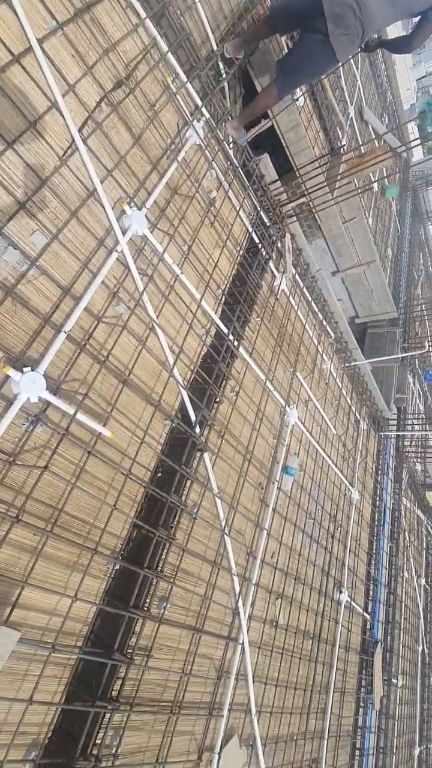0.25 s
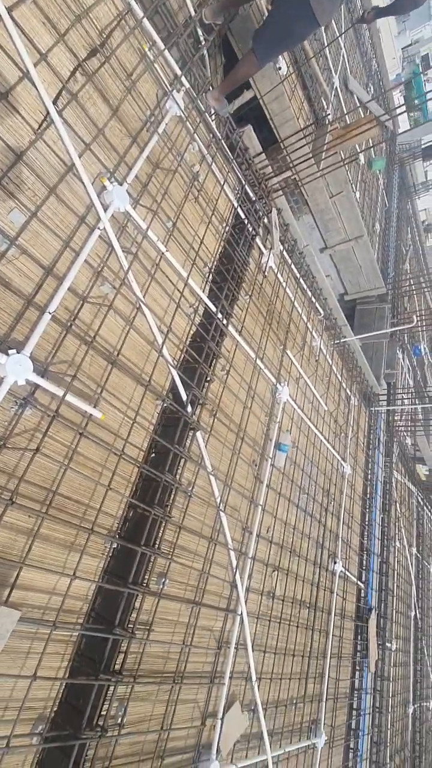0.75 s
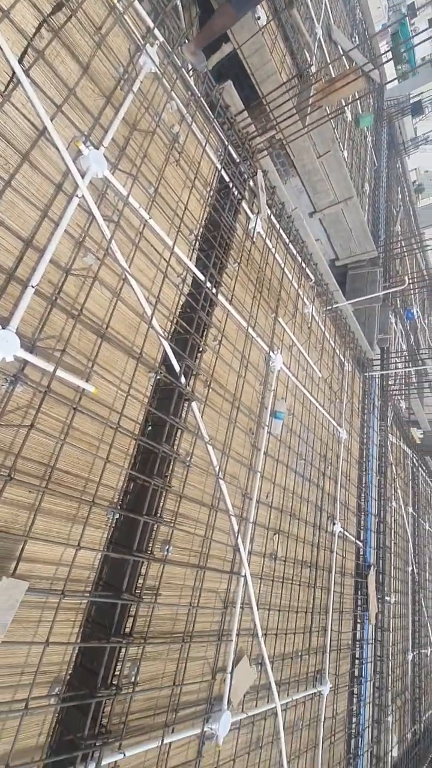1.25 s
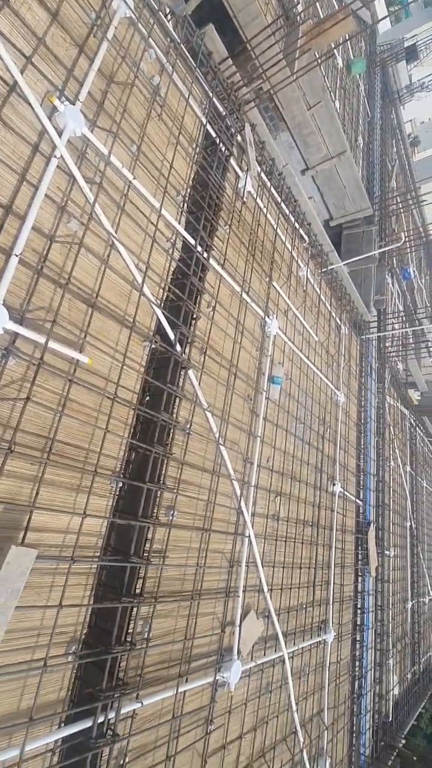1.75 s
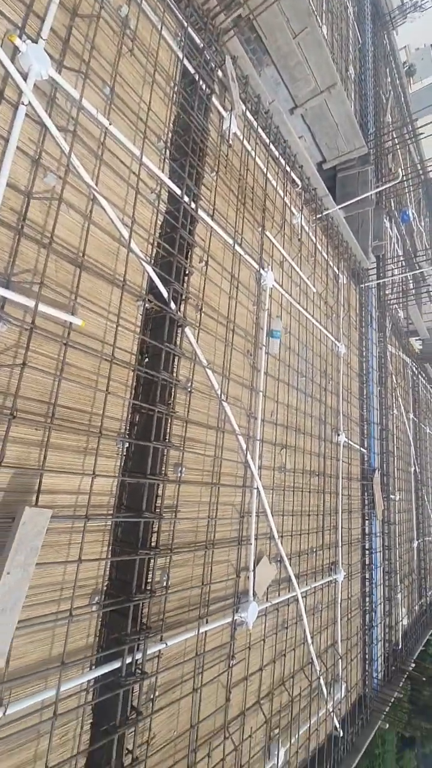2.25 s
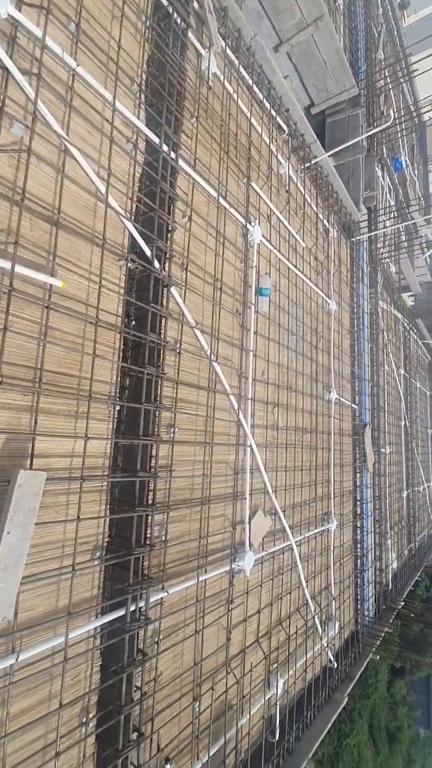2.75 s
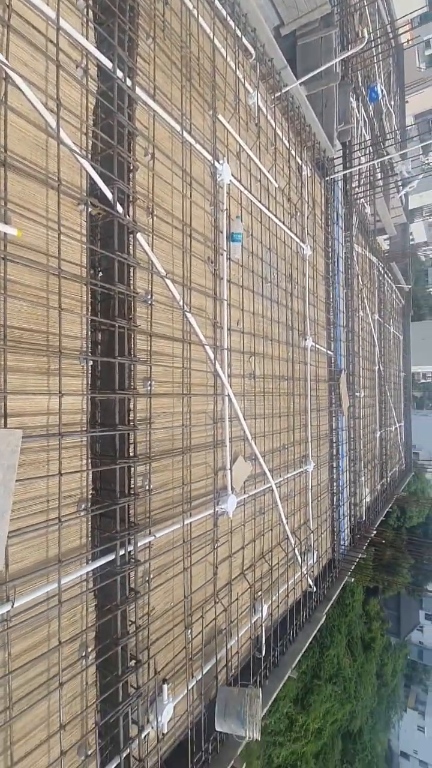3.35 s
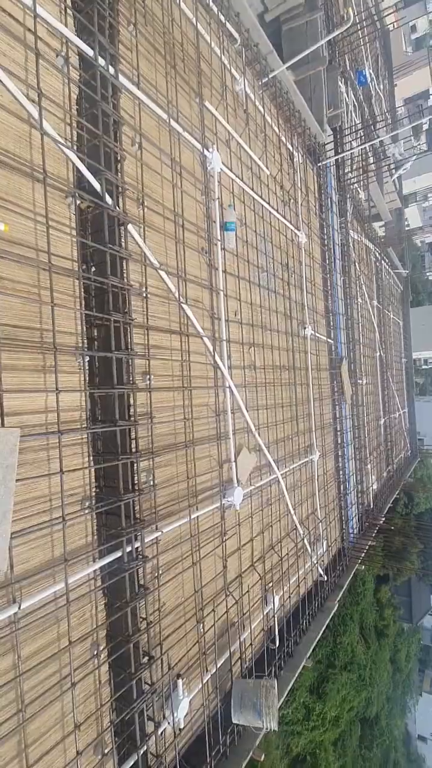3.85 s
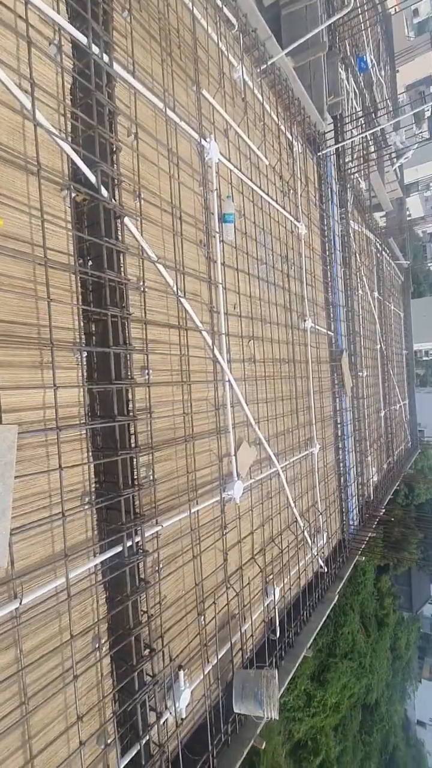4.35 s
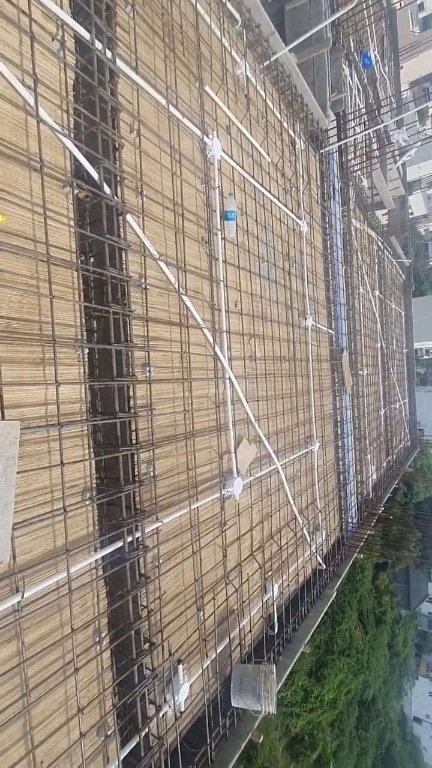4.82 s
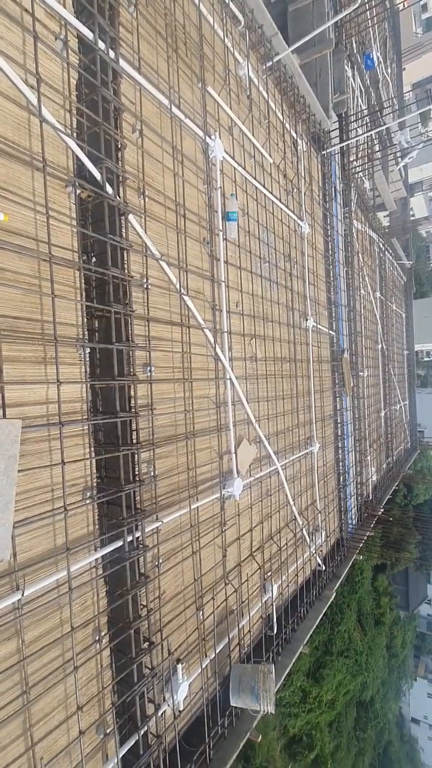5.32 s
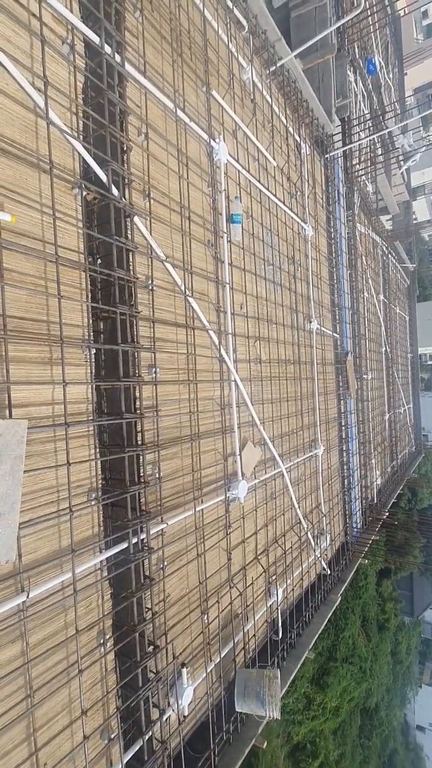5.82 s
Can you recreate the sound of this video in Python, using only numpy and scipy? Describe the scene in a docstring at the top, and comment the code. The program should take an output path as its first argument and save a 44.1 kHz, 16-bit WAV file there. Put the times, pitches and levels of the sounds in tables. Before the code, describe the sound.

A hammer knocks steadily on a wooden deck outdoors, echoing off buildings, while wind buffets the microphone and nearby cloth rustles before calm settles.

```python
"""A hammer strikes a board on a building site's plywood deck about every 0.6 s: damped modes and noise, then echoes.
Wind is shaped noise that buffets both microphone ports, mostly for the first four seconds.
Cloth rustles close by in grainy noise rubs; a few tiny ticks fall among the early gusts.
Behind lie the noise rush of far traffic, two thin hiss swells and, near the end, a machine's whine of sines."""
import sys
import numpy as np
from scipy import signal
from scipy.fft import rfft, irfft, next_fast_len
from scipy.io import wavfile
from scipy.ndimage import uniform_filter1d, map_coordinates

SR = 44100
rng = np.random.default_rng(int(sys.argv[2]) if len(sys.argv) > 2 else 0)


def unload_wav(signal):
    """Save mono or channel-first audio to the path in sys.argv[1] as 16-bit WAV at rate SR, clipped to [-1, 1]."""
    wavfile.write(
        sys.argv[1],
        SR,
        np.round(np.clip(np.atleast_2d(signal).T, -1, 1) * 32767).astype(np.int16),
    )


N = 268290


def amp(db):
    """Decibels to gain."""
    return 10 ** (np.asarray(db) / 20)


def unit(x):
    """Scale to rms 1."""
    return x / np.sqrt(np.mean(x ** 2) + 1e-20)


def along(points, hz):
    """(Hz, value) points read on a log frequency axis."""
    point_hz, value = np.transpose(points)
    return np.interp(np.log(hz + 1), np.log(point_hz + 1), value)


def curves(rows):
    """One value per sample for each column after the time."""
    time_s, *columns = np.transpose(rows)
    return [np.interp(np.arange(N) / SR, time_s, column) for column in columns]


def wobble(knots_per_s):
    """A smooth random curve for each port."""
    at = np.arange(N) * knots_per_s / SR
    knots = rng.standard_normal((2, int(at[-1]) + 4))
    return np.array([map_coordinates(port, [at]) for port in knots])


def filtered(x, response):
    """x times a response of frequency."""
    n = x.shape[-1]
    padded = next_fast_len(n + 8192)
    spectrum = rfft(x, padded) * response(np.fft.rfftfreq(padded, 1 / SR))
    return irfft(spectrum, padded)[..., :n]


def coloured(x, spectrum):
    """x through a (Hz, dB) spectrum."""
    return filtered(x, lambda hz: amp(along(spectrum, hz)))


def noise(spectrum, grain_db=0, grains_per_s=100):
    """Noise of rms 1, unrelated between the ports, clumped into grains."""
    clumps = amp(grain_db * wobble(grains_per_s))
    return unit(coloured(rng.standard_normal((2, N)) * clumps, spectrum))


def dying(spectrum, t60s):
    """Two noise tails of energy 1 in which each frequency dies at its own speed."""
    hz, t, bins = signal.stft(rng.standard_normal((2, SR * 3 // 4)), SR, nperseg=128)
    decay = amp(-60 * t / along(t60s, hz)[:, None])
    tail = signal.istft(bins * decay, SR, nperseg=128)[1]
    tail = coloured(tail, spectrum)
    return tail / np.linalg.norm(tail, axis=1, keepdims=True)


def add(track, start_s, sound):
    """Mix a sound into the track."""
    part = track[..., max(round(start_s * SR), 0):][..., :sound.shape[-1]]
    part += sound[..., :part.shape[-1]]


def swell(start_s, length_s, attack_s, release_s):
    """An envelope that rises smoothly, holds and dies away."""
    t = np.arange(N) / SR - start_s
    rise = np.sin(np.pi / 2 * np.clip(t / attack_s, 0, 1)) ** 2
    return rise * np.exp(-np.maximum(t - length_s, 0) / release_s)


# wind strength: time_s, strength_db
WIND_STRENGTH = [(0.0, -41.5), (0.16, -43.5), (0.27, -24.5), (0.39, -23), (0.56, -35), (0.79, -26),
                 (0.92, -27), (1.12, -23.5), (1.24, -31.5), (1.29, -23), (1.57, -27), (1.6, -25.5),
                 (1.81, -26), (1.92, -35), (1.96, -31), (2.39, -28.5), (2.99, -34), (3.31, -23.5),
                 (3.69, -26), (3.82, -42.5), (4.03, -32), (4.09, -41), (4.17, -36), (4.23, -60),
                 (4.34, -47.5), (4.59, -66.5), (4.84, -39), (5.11, -77)]
# large eddies: freq_hz, density_db [dB per Hz]
RUMBLE_SPECTRUM = [(15, -12), (25, -18), (40, -16.5), (70, 0), (120, -3), (200, -8.5), (350, -20),
                   (700, -28), (1500, -94)]
# small eddies: freq_hz, density_db [dB per Hz]
FLUTTER_SPECTRUM = [(80, -36), (200, -4.5), (350, 2.5), (550, -3.5), (800, -12.5), (1200, -23), (2200, -50),
                    (4000, -44.5), (16000, -71)]
# smallest eddies: freq_hz, density_db [dB per Hz]
SPIT_SPECTRUM = [(400, -14), (800, -1), (1100, 1), (1500, 0), (1900, -8), (2600, -20), (4000, -29),
                 (8000, -42), (16000, -52)]
FULL_GUST_DB = -25  # strength of a full gust
RUMBLE_DB, FLUTTER_DB, SPIT_DB = -26.5, -25, -44.5  # in a full gust, before the quick swings
FLUTTER_DB_PER_DB, SPIT_DB_PER_DB = 1.4, 1  # growth with strength
OWN_EDDY_DB, SHARED_EDDY_DB = 2.25, 1.92  # quick swings at each port and at both


def wind():
    """One strength drives all eddies: large rumble, small flutter, smallest spit, differently at each port."""
    gust_db = curves(WIND_STRENGTH)[0] - FULL_GUST_DB
    eddies = amp(OWN_EDDY_DB * wobble(36) + SHARED_EDDY_DB * wobble(45)[0])
    rumble = amp(RUMBLE_DB + gust_db) * noise(RUMBLE_SPECTRUM)
    flutter_level = amp(FLUTTER_DB + FLUTTER_DB_PER_DB * gust_db)
    flutter = flutter_level * noise(FLUTTER_SPECTRUM, grain_db=3.3, grains_per_s=170)
    spit_level = amp(SPIT_DB + SPIT_DB_PER_DB * gust_db)
    spit = spit_level * noise(SPIT_SPECTRUM, grain_db=4.2, grains_per_s=180)
    return eddies * (rumble + flutter + spit)


# far traffic: freq_hz, density_db [dB per Hz]
TRAFFIC_SPECTRUM = [(25, -11), (60, -1), (110, 2), (190, -8), (300, -3), (480, -1), (700, -8), (1100, -8),
                    (2400, -13), (3300, -21), (6500, -23), (8500, -36), (16000, -39)]
# swells of thin high hiss: start_s, length_s, level_db
HISS_SWELLS = [(4.504, 0.49, -58), (5.44, .22, -58)]
HISS_ATTACK_S, HISS_RELEASE_S = 0.11, 0.093
# a far machine's whine: pitch_hz, level_db
WHINE_PARTIALS = [(495, -63), (1480, -68), (1975, -69), (2465, -70)]


def town():
    """Far traffic as slowly swaying noise, swells of high hiss and a machine whining as wavering sines."""
    rush = noise(TRAFFIC_SPECTRUM) * amp(1.1 * wobble(3.1))
    traffic = amp(-58) * unit(rush + .2 * rush[::-1])  # each port hears some of the other's rush
    swells = sum(amp(level_db) * swell(start_s, length_s, HISS_ATTACK_S, HISS_RELEASE_S)
                 for start_s, length_s, level_db in HISS_SWELLS)
    hiss = swells * noise([(9000, -24.5), (12500, -19.5), (14500, -16), (16000, -12.5)])
    t = np.arange(N) / SR
    running = curves([(5.42, 0), (5.5, 1)])[0]  # fades in, then holds
    whine = np.zeros((2, N))
    for pitch_hz, level_db in WHINE_PARTIALS:
        level = amp(level_db + 2.5 * wobble(14))
        whine += level * np.sin(2 * np.pi * pitch_hz * t + 1.1 * wobble(30))
    return traffic + hiss + running * whine


# hardest buffets: time_s, level_db [before BUFFET_GAIN_DB]
HARD_BUFFETS = [(0.214, -18.5), (0.27, -18), (0.311, -18), (0.359, -18.5), (0.43, -14), (0.784, -9),
                (1.039, -4), (1.113, -10), (1.293, -16), (1.327, -16), (1.356, -10), (1.765, -11),
                (2.0, -18.5), (2.56, -16.5), (3.165, -11.5), (3.288, -22), (3.57, -20)]
# thud of a buffet: freq_hz, density_db [dB per Hz]
THUD_SPECTRUM = [(25, -14), (90, 0), (400, 0), (750, -4), (1300, -19), (2200, -36), (4000, -52),
                 (16000, -80)]
BUFFET_GAIN_DB, BUFFET_RISE_S = -0.5, 0.0053  # gain of every buffet; time to its crest
LESSER_PER_S = 3
LESSER_OVER_WIND_DB, LESSER_SCATTER_DB = 7, 1.5  # before BUFFET_GAIN_DB


def buffets():
    """Eddies burst right on the ports with dull thuds; lesser ones come at random and follow the wind strength."""
    out = np.zeros((2, N))
    u = np.arange(SR // 8) / SR / BUFFET_RISE_S
    times_s = rng.uniform(0, N / SR, int(LESSER_PER_S * N / SR))
    strength_db = np.interp(times_s, *np.transpose(WIND_STRENGTH))
    scatter_db = LESSER_SCATTER_DB * rng.standard_normal(len(times_s))
    lesser_db = strength_db + LESSER_OVER_WIND_DB + scatter_db
    for time_s, level_db in [*HARD_BUFFETS, *zip(times_s, lesser_db)]:
        burst = coloured(rng.standard_normal((2, len(u))) * u * np.exp(-u), THUD_SPECTRUM)
        burst /= abs(burst).max(axis=1, keepdims=True)
        add(out, time_s - .001, amp(level_db + BUFFET_GAIN_DB) * burst)
    return out


# small dry ticks close by: start_s, level_db [relative]
TICK_TIMES = [(0.2164, -42), (0.2284, -44), (0.2414, -50), (0.2627, -48), (0.3112, -41)]


def ticks():
    """Tiny bright clicks: noise that dies within some hundredths of a second, with no ring."""
    out = np.zeros((2, N))
    spectrum = [(800, -9), (2500, 17), (7000, -7), (15000, -12)]
    t60s = [(1000, 0.023), (12000, .012)]
    for start_s, level_db in TICK_TIMES:
        add(out, start_s, amp(level_db + 18) * dying(spectrum, t60s))
    return out


# hard contact, lower modes: freq_hz, level_db [relative], t60_s
CLACK_MODES = [(1090, -6, 0.0046), (1322, 8, 0.035), (1390, -5, 0.029), (1846, 8, 0.0091),
               (2095, -6, 0.042), (2360, -12, 0.0098), (3390, -7, 0.021)]
# hard contact, upper modes: freq_hz, level_db [relative], t60_s
CRACK_MODES = [(4020, 15, 0.0044), (4310, -9, 0.026), (5740, 7.5, 0.0094), (5600, -29, .014),
               (6040, -17, 0.09)]


def ring(modes, t, rise_s):
    """Damped modes, struck at new strengths and slightly new pitches."""
    freq_hz, level_db, t60_s = np.transpose(modes)[..., None]
    strength, detune = rng.standard_normal((2, len(modes), 1))
    decay = amp(level_db + 0.5 * strength - 60 * t / t60_s)
    waves = decay * np.sin(2 * np.pi * freq_hz * (1 + 0.015 * detune) * t)
    return waves.sum(0) * (1 - np.exp(-t / rise_s))


# low modes of the board: ratio [x board pitch], level_db [relative], t60_s, half_swell_s
BOARD_MODES = [(1.03, 6, 0.012, 0.0022), (.88, -18, 0.13, 0.0056), (1.16, -15, 0.23, 0.0032),
               (1.42, -13, 0.075, 0.0014)]
# graze, full contact and chatter of the hammer face: delay_s, level_db [relative]
FACE_CONTACTS = [(.001, -12), (.005, 2), (0.0129, -23)]
# splintery noise: freq_hz, density_db [dB per Hz]
SPLINTER_SPECTRUM = [(300, -14), (900, 11), (1500, 2), (2400, 1.5), (3200, -4.5), (4200, 6), (6200, 8.5),
                     (7300, -3.5), (10000, -11.5), (15500, -16)]
# its decay: freq_hz, t60_s
SPLINTER_T60 = [(500, 0.13), (2000, 0.052), (6000, 0.0041), (14000, 0.015)]


def blow(board_hz, clack_db, crack_db):
    """The board swells into a hollow knock; the steel face grazes it, cracks at the crest and chatters once."""
    t = np.arange(SR // 4) / SR
    knock = np.zeros(len(t))
    for ratio, level_db, t60_s, half_swell_s in BOARD_MODES:
        shape = amp(-60 * t / t60_s) * (1 - np.exp(-(t / (2 * half_swell_s)) ** 3))
        wave = np.sin(2 * np.pi * ratio * board_hz * t)
        add(knock, .0024, amp(level_db) * shape / shape.max() * wave)
    for delay_s, contact_db in FACE_CONTACTS:
        splinters = dying(SPLINTER_SPECTRUM, SPLINTER_T60)[0, :len(t)] * (1 - np.exp(-t / 0.0009))
        clack = amp(clack_db - 1.5) * ring(CLACK_MODES, t, rise_s=0.00043)
        crack = amp(crack_db + 4) * ring(CRACK_MODES, t, rise_s=0.0014)
        add(knock, delay_s, amp(contact_db) * (clack + crack + amp(crack_db + 35) * splinters))
    return knock


# hammer blows: time_s, level_db, board_hz, clack_db, crack_db [all levels relative], pan_db [left minus right]
HAMMER_BLOWS = [(0.401, -11, 686, -14.5, -18.5, -1), (1.012, -11.5, 587, -13.5, -20.5, -6),
                (1.605, -11, 764, -13, -21.5, -1), (2.211, -15.5, 504, -19, -13.5, -3),
                (2.842, -11.5, 547, -12.5, -20.5, -0.5), (3.422, -7, 545.5, -12.5, -20, 1.5),
                (4.017, -10, 544, -23, -16, 0), (4.623, -10.5, 540.5, -15, -17, -0.5),
                (5.24, -6, 546, -14, -18.5, 0), (5.844, -6.5, 556.3, -12, -20, -0.5)]
# nearby surfaces: delay_s, level_db
NEAR_SURFACES = [(.0118, -18.5), (.0135, -19), (.0228, -26), (.029, -43)]
# lead of the left port: freq_hz, lead_s
LEFT_LEAD = [(500, .00037), (2500, .0005)]
# scatter from the deck: freq_hz, level_db [relative]
DECK_SPECTRUM = [(150, 1.5), (350, -1.5), (560, -2), (900, -8), (1500, -10.5), (5000, -10.5), (12000, -11)]
# its decay: freq_hz, t60_s
DECK_DECAY = [(200, 0.15), (600, 0.086), (2000, 0.26), (6000, 0.12), (12000, 0.32)]
# scatter from the buildings: freq_hz, level_db [relative]
SITE_SPECTRUM = [(100, 12), (300, -2), (560, -15), (1100, -4), (2500, 14), (5500, 10), (9000, 18.5),
                 (15000, 6)]
# its decay: freq_hz, t60_s
SITE_DECAY = [(150, 0.3), (500, 1), (2500, 1), (6000, 0.61), (12000, 0.3)]


def hammer():
    """Each blow arrives directly, off nearby surfaces, scattered by the deck and late from the buildings."""
    out = np.zeros((2, N))
    ports = np.array([[1], [-1]])
    for time_s, level_db, board_hz, clack_db, crack_db, pan_db in HAMMER_BLOWS:
        start_s = time_s - .004
        hit = amp(level_db - 2) * blow(board_hz, clack_db, crack_db)
        dull = coloured(hit, [(700, 5), (2500, -13.0), (7000, -7)])
        near = hit.copy()
        for delay_s, surface_db in NEAR_SURFACES:
            add(near, delay_s, amp(surface_db) * dull)
        # half the lead forward at the left, half back at the right
        pair = filtered(near, lambda hz: np.exp(1j * np.pi * hz * along(LEFT_LEAD, hz) * ports))
        add(out, start_s, amp(ports * pan_db / 2) * pair)
        deck = dying(DECK_SPECTRUM, DECK_DECAY)
        add(out, start_s + 0.0046, amp(-9) * signal.fftconvolve(hit[None], deck, axes=1))
        far = dying(SITE_SPECTRUM, SITE_DECAY)
        # the facades answer one after another, so the scatter builds up
        far *= 1 - np.exp(-(np.arange(far.shape[1]) / SR / 0.02) ** 2)
        add(out, start_s + 0.054, amp(-16) * signal.fftconvolve(hit[None], far, axes=1))
    return out


# boom of the whole deck: freq_hz, density_db [dB per Hz]
BOOM_SPECTRUM = [(70, -13), (140, -12.5), (220, -7), (300, -3.5), (380, -7.5), (520, -11), (900, -17.5),
                 (3000, -59)]


def deck_boom():
    """Each blow spreads into the big plywood deck, which booms low and dies away slowly."""
    force, t = np.zeros(N), np.arange(SR) / SR
    for time_s, level_db, *_ in HAMMER_BLOWS:
        add(force, time_s, amp(level_db - 22.5) * (1 - np.exp(-t / 0.011)) * amp(-60 * t / 0.79))
    return force * noise(BOOM_SPECTRUM)


def patchy(x, depth_db):
    """Bands about 500 Hz wide swell and fade on their own every few hundredths of a second."""
    bins = signal.stft(x, nperseg=512)[2]
    field = uniform_filter1d(rng.standard_normal(bins.shape[1:]), size=6, axis=0)
    field = uniform_filter1d(field, size=10, axis=1)
    return unit(signal.istft(bins * amp(depth_db * unit(field)), nperseg=512)[1][:, :N])


RUB_ATTACK_S, RUB_RELEASE_S = 0.045, 0.062  # takes hold; time constant as it comes to rest
PRESS_DB, PRESS_CREST = 7, 0.79  # rise in pressure up to the crest; crest as a share of the length


def rub(start_s, length_s):
    """Envelope of a rub: it takes hold, presses harder up to its crest and eases off."""
    progress = (np.arange(N) / SR - start_s) / length_s
    press_db = np.interp(progress, [0, PRESS_CREST, 1], [-PRESS_DB, 0, -PRESS_DB / 2])
    return amp(press_db) * swell(start_s, length_s, RUB_ATTACK_S, RUB_RELEASE_S)


# rubs of cloth: start_s, length_s, level_db [relative], fizz_db [relative to the rub]
CLOTH_RUBS = [(0.457, 0.33, -42.5, -13), (0.81, .12, -53.5, -14), (1.116, 0.58, -48, -10.5),
              (1.616, 0.42, -50, -11.5), (2.291, 0.23, -36, -12.5), (2.494, .24, -34, -7.5),
              (2.794, 0.25, -43.5, -15.5), (2.968, 0.16, -34, -8.5), (3.2, 0.093, -61, -3),
              (3.46, .26, -55, -7.5), (4.255, .11, -52.5, -9), (4.913, 0.15, -49.5, -11)]
# body of the rustle: freq_hz, density_db [dB per Hz]
RUSTLE_SPECTRUM = [(500, -15), (1200, 3), (1900, 3), (2700, 4), (4200, 3.5), (6300, 2), (7200, -0.5),
                   (8000, -13), (10000, -27), (16000, -40)]
# its high fizz: freq_hz, density_db [dB per Hz]
FIZZ_SPECTRUM = [(4000, -3.5), (7500, -7), (9000, -1), (10000, -1.5), (11500, -3.5), (14000, -2),
                 (16000, -5)]
# bounces off deck and body: delay_s, gain
RUSTLE_BOUNCES = [(.0019, .22), (.0053, .65), (.0068, .3)]
RUSTLE_DB, REST_DB = -3, -66  # gain of the rustle in a rub; direct level of the steady rustle beneath


def cloth():
    """Fibres catch and slip in a grainy rustle; its bounces comb it, drifting as the wearer turns."""
    rustle = patchy(noise(RUSTLE_SPECTRUM, grain_db=4, grains_per_s=350), depth_db=2.5)
    fizz = patchy(noise(FIZZ_SPECTRUM, grain_db=3, grains_per_s=500), depth_db=2.5)
    drag = amp(1.1 * wobble(45)[0])
    rubs = np.zeros((2, N))
    for start_s, length_s, level_db, fizz_db in CLOTH_RUBS:
        texture = amp(RUSTLE_DB) * rustle + amp(fizz_db) * fizz
        rubs += amp(level_db) * rub(start_s, length_s) * texture
    direct = drag * rubs + amp(REST_DB) * noise(RUSTLE_SPECTRUM)
    n = np.arange(N)
    stretch = 1 + .008 * wobble(3)[0]  # slow drift of the bounce delays
    out = direct.copy()
    for delay_s, gain in RUSTLE_BOUNCES:
        out += gain * np.array([np.interp(n - delay_s * SR * stretch, n, port) for port in direct])
    return out


def scene():
    """All sources at the two ports."""
    return wind() + town() + buffets() + ticks() + hammer() + deck_boom() + cloth()


TOP_HZ = 15900


def record(dry):
    """The camera rounds off peaks near full scale and keeps nothing above its band limit."""
    rounded = dry / (1 + np.abs(dry) ** 6) ** (1 / 6)
    return filtered(rounded, lambda hz: hz < TOP_HZ)


dry = scene()
out = record(dry)
unload_wav(out)
```